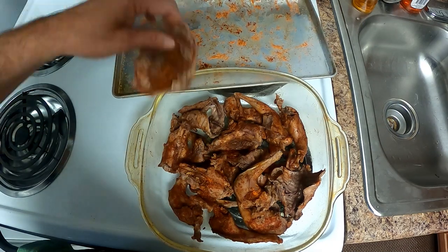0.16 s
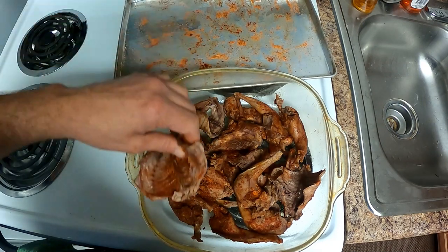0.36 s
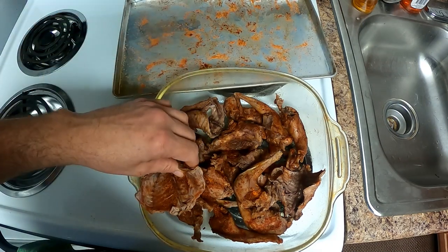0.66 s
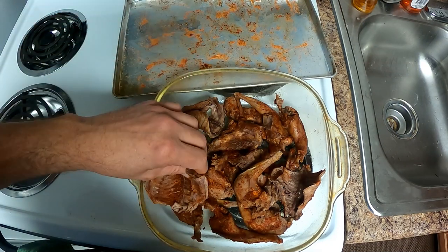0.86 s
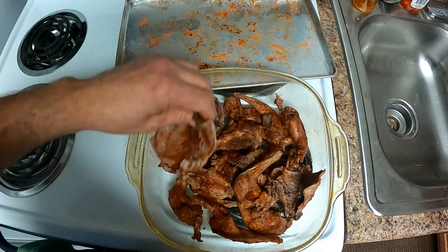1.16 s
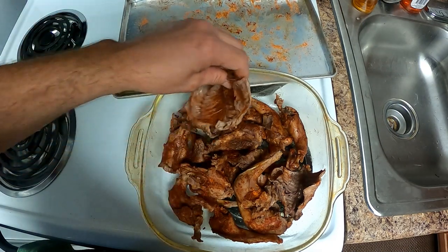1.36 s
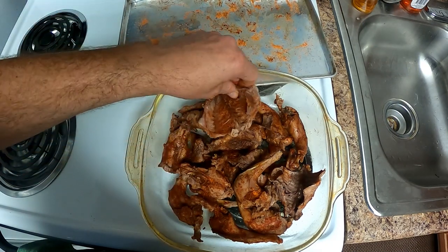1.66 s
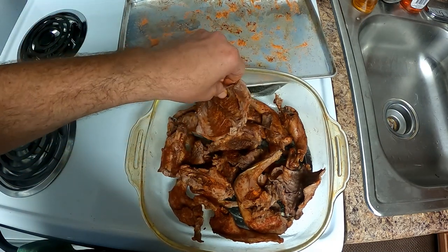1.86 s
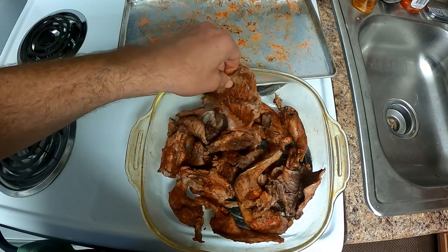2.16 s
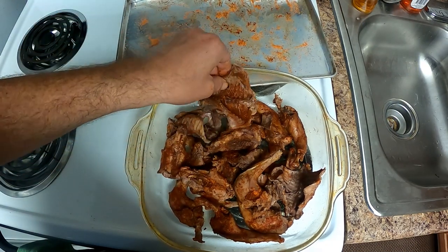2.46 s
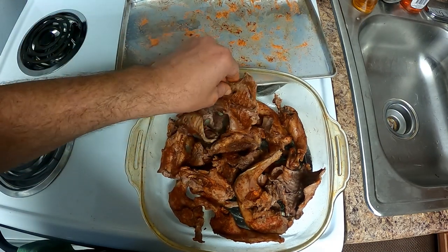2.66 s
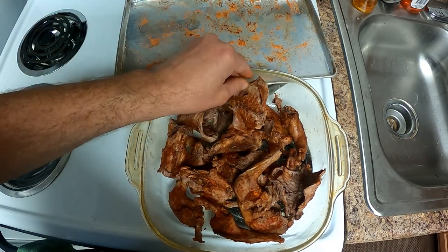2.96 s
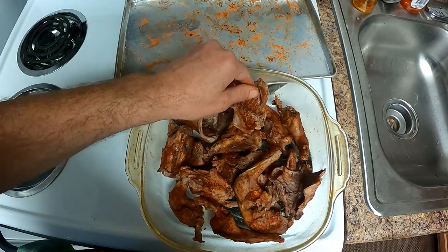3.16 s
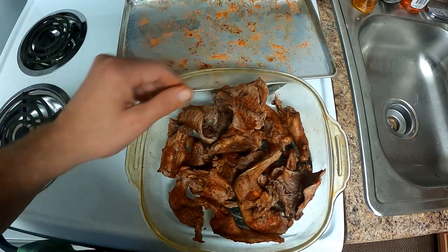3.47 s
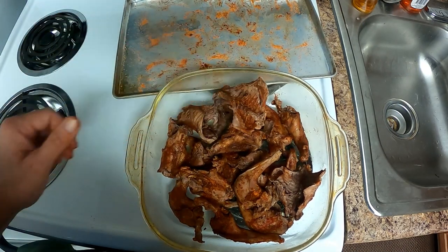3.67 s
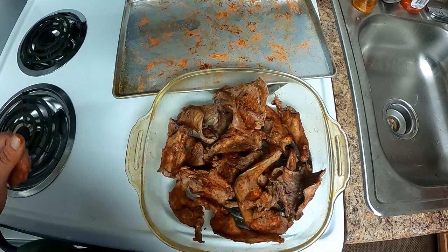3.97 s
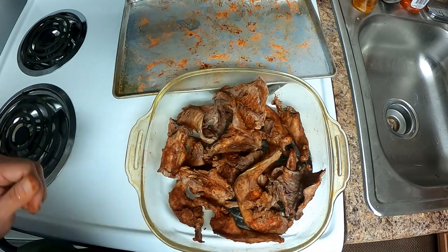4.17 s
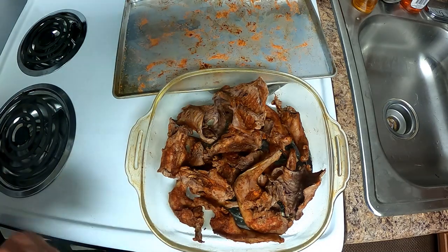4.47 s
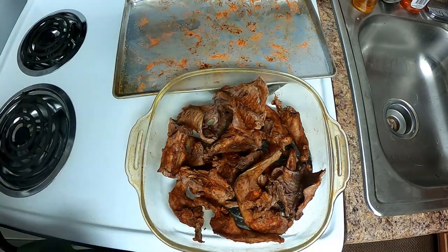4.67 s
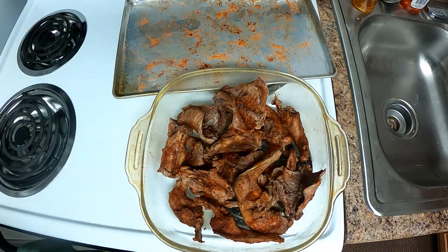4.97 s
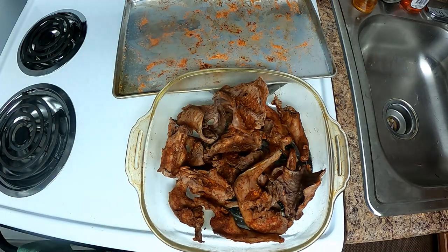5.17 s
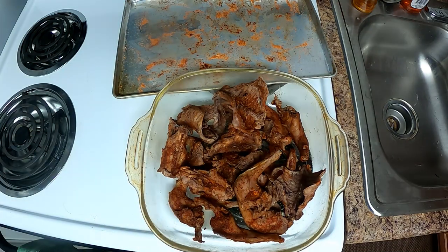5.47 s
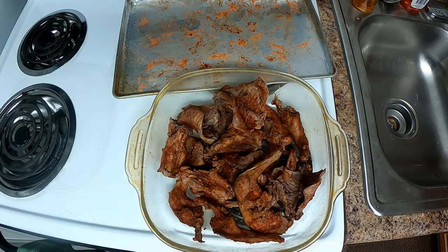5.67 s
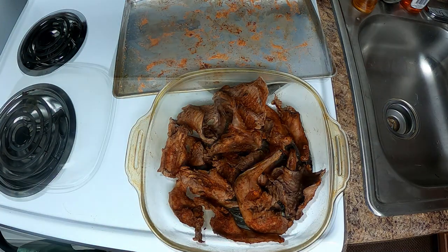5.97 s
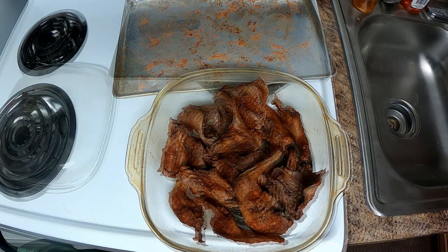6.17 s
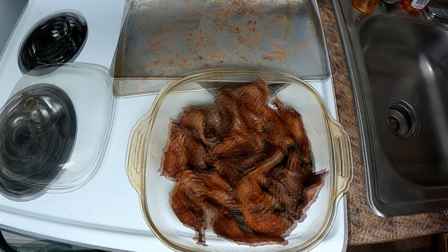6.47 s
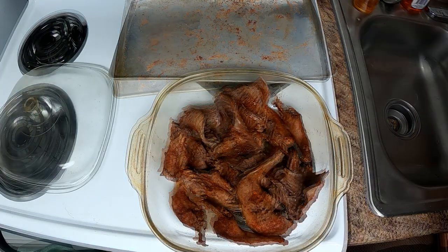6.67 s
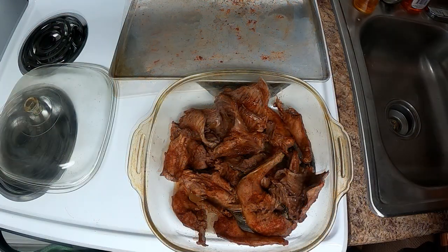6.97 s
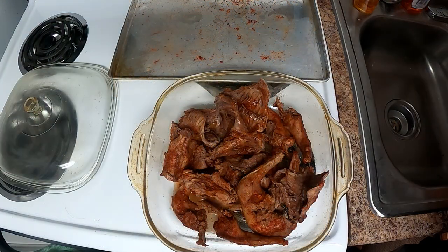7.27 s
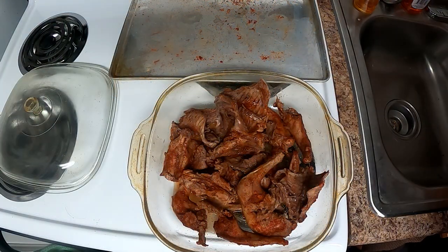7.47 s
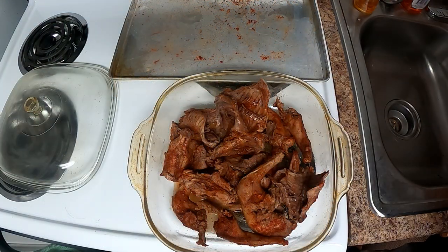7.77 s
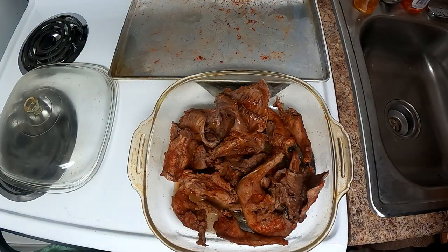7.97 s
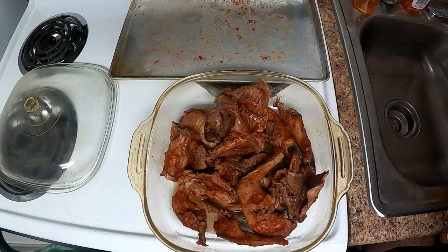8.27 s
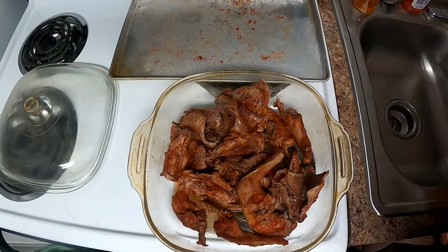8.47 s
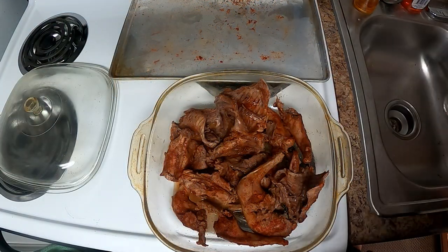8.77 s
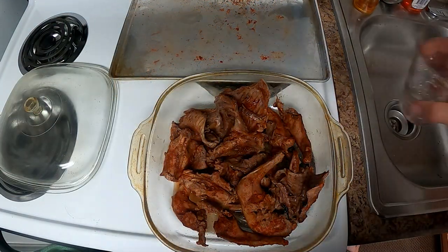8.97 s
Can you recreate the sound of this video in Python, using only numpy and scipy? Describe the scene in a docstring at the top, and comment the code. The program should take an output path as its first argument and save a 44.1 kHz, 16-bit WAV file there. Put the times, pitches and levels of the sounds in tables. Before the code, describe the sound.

Short, damped glass clunks and stove thuds come with tinny rattles, slippery squelches and tiny pops. They thin out, return with a sharper knock, then rock to a stop. Quiet skin and cloth strokes follow, then a deep double-bouncing lid thud, a one-second splashing tap hiss, soft bumps and final rubs. Close microphone, small quiet kitchen with short echo.

```python
"""A glass baking dish rocks and knocks on a stove as meat is pushed into it, and a metal tray rattles beside
it. Knocks ring the modes of the glass and shake the stove top; the tray chatters in noise and tiny contacts.
The meat slides, pops and squelches and the dish skids; hands are wiped in strokes of noise, and a glass lid
thuds down. After a few soft bumps the tap hisses briefly into the steel sink, as fluttering noise with splash
resonances. A small kitchen, heard from close above the dish."""
import sys
import numpy as np
from scipy import signal
from scipy.fft import rfft, irfft, next_fast_len
from scipy.io import wavfile

SR = 44100
rng = np.random.default_rng(int(sys.argv[2]) if len(sys.argv) > 2 else 0)


def wav_record(signal):
    """Record a signal, one row per channel, as 16-bit PCM in the file named by sys.argv[1]."""
    frames = np.transpose(np.atleast_2d(signal))
    bounded = np.clip(frames, -1, 1)
    # unit amplitude maps onto the largest positive 16-bit level
    quanta = np.round(bounded * 32767).astype(np.int16)
    wavfile.write(sys.argv[1], SR, quanta)


N = 401751   # length in samples

# How wide the sound spreads at each pitch. Each row: frequency in Hz, side level against the middle in dB.
STEREO_WIDTH = [(60, -28), (250, -16), (1000, -13), (2200, -7), (4500, -5.5), (8000, -.5), (15000, -1)]


def from_db(db):
    """Turn decibels into a gain."""
    return np.exp(np.asarray(db) * (np.log(10) / 20))


def rms_one(x):
    """Scale a signal to rms 1."""
    return x / np.sqrt(np.mean(x ** 2) + 1e-20)


def level(rows):
    """Gain over time from rows of seconds and dB, silent outside their span."""
    rows = np.array(rows)
    db = np.interp(np.arange(N) / SR, rows[:, 0], rows[:, 1], left=-200, right=-200)
    return from_db(db)


def at_hz(points, hz):
    """Read a table between its rows, on a log-frequency axis."""
    points = np.array(points)
    return np.interp(np.log(hz + 1), np.log(points[:, 0]), points[:, 1])


def noise(spectrum):
    """Coloured stereo noise, wider towards the treble; its middle has rms 1."""
    size = next_fast_len(N)
    hz = np.arange(size // 2 + 1) * SR / size
    white = rng.standard_normal((2, len(hz))) + 1j * rng.standard_normal((2, len(hz)))
    white[1] *= from_db(at_hz(STEREO_WIDTH, hz))
    mid, side = irfft(white * from_db(at_hz(spectrum, hz)), size)[:, :N]
    return np.array([mid + side, mid - side]) / mid.std()


def grains(spectrum, per_s):
    """Coloured stereo crackle of tiny separate contacts; its middle has rms 1."""
    size = next_fast_len(N)
    hz = np.arange(size // 2 + 1) * SR / size
    happens = rng.random(size) < per_s / SR
    contacts = happens * rng.choice([-1, 1], (2, size)) * rng.uniform(0.66, 1.5, size)
    shaped = rfft(contacts) * from_db(at_hz(spectrum, hz))
    shaped[1] *= from_db(at_hz(STEREO_WIDTH, hz))
    mid, side = irfft(shaped, size)[:, :N]
    return np.array([mid + side, mid - side]) / mid.std()


def flutter(rate, depth_db):
    """A random gain that takes a new value rate times a second; rms 1."""
    points = np.clip(rng.standard_normal(N // 8), -2, 2)
    wander = np.interp(np.arange(N) * rate / SR, np.arange(len(points)), points)
    return rms_one(from_db(depth_db * wander))


def clicks(times, db):
    """One click per blow."""
    out = np.zeros(N)
    spots = np.clip(np.round(np.asarray(times) * SR).astype(int), 0, N - 1)
    np.add.at(out, spots, from_db(db))
    return out


def dying(blows, t60, rise):
    """Envelope of blows whose energy builds up quickly and dies away by 60 dB in t60 seconds."""
    fall, swelling = from_db(-120 / (t60 * SR)), np.exp(-1 / (rise * SR))
    energy = signal.lfilter([1], [1, -fall], blows ** 2 + 1e-20)
    return np.sqrt(signal.lfilter([1 - swelling], [1, -swelling], energy))


def held(start, end, attack, t60):
    """Envelope that rises at start, holds, and dies away after end."""
    t = np.arange(N) / SR
    rising = 1 - np.exp(-np.maximum(t - start, 0) / attack)
    return rising * from_db(-60 * np.maximum(t - end, 0) / t60)


def swell(peak, rise, fall):
    """Envelope that grows up to its peak and fades again."""
    t = np.arange(N) / SR - peak
    return np.exp(np.maximum(np.minimum(t / rise, -t / fall), -20))


def ring(blows, hz, t60):
    """A unit click sets a dying sine of height 1 ringing."""
    r, w = from_db(-60 / (t60 * SR)), 2 * np.pi * hz / SR
    return signal.lfilter([0, np.sin(w)], [1, -2 * r * np.cos(w), r * r], blows + 1e-18)


def resonate(x, hz, width):
    """A resonance that favours one pitch, with gain 1 on top."""
    r = np.exp(-np.pi * width / SR)
    feedback = [1, -2 * r * np.cos(2 * np.pi * hz / SR), r * r]
    return signal.lfilter(np.array([1, 0, -1]) * (1 - r * r) / 2, feedback, x)


def struck(times, db, modes, vary_db, spread_db, detune, dulling=0, damping=0):
    """Each blow rings each mode with its own strength, decay and slightly shifted pitch."""
    hz, mode_db, t60 = np.transpose(modes)
    out = np.zeros((2, N + SR))
    t = np.arange(int(min(t60.max(), 1) * SR)) / SR
    # neighbouring modes swing in opposite phase and lean to opposite sides
    sign = (-1) ** np.arange(len(hz))
    lean = sign * from_db(spread_db * np.array([sign, -sign]))
    for s, blow_db in zip(times, db):
        strength, shift, grip = rng.standard_normal((3, len(hz)))
        fade = from_db(-60 * t / (t60 * np.exp(damping * grip))[:, None])
        # a softer blow stays in contact longer and excites the high modes less
        tilt_db = dulling * (blow_db - np.median(db)) * np.log2(hz / np.median(hz))
        rings = fade * np.sin(2 * np.pi * (hz * (1 + detune * shift))[:, None] * t)
        gains = lean * from_db(blow_db + mode_db + tilt_db + vary_db * strength)
        start = max(round(s * SR), 0)
        out[:, start:start + len(t)] += gains @ rings
    return out[:, :N]


def kitchen(x, wet_db, gap=0.00154):
    """Add the room: a dense stereo tail, built in bands, whose treble dies sooner."""
    # How long the kitchen echoes. Each row: frequency in Hz, time to fall by 60 dB in seconds.
    echo_times = [(150, 0.86), (400, 0.3), (1200, 0.23), (3000, 0.22), (8000, 0.062), (15000, 0.076)]
    t, tail = np.arange(SR * 3 // 4) / SR, 0
    edges = np.geomspace(110, 16000, 9)
    for low, high in zip(edges, edges[1:]):
        hz = np.sqrt(low * high)
        band = signal.butter(2, [low, high], "band", fs=SR, output="sos")
        mid, side = signal.sosfilt(band, rng.standard_normal((2, len(t))))
        side = side * from_db(min(at_hz(STEREO_WIDTH, hz) + 3, 0)) * [[1], [-1]]
        fade = from_db(-60 * t / at_hz(echo_times, hz))
        tail = tail + rms_one(mid + side) * np.sqrt(high - low) * fade
    tail = tail * (t > gap)   # the first echo comes after a short gap in seconds
    tail = tail / np.sqrt(np.sum(tail ** 2) / 2)
    return x + from_db(wet_db) * signal.fftconvolve(x, tail, axes=1)[:, :N]


def dish_blows(count=5):
    """Times and ring, rattle and thud levels of all knocks: the hand's and the free swings."""
    # The hand knocks the dish about. Each row: time in seconds, glass ring in dB, tray rattle in dB.
    hand_knocks = [(0.0014, -29, -48.5), (0.052, -47, -41.5), (0.069, -25.5, -52.5), (0.159, -45, -39.5),
                   (0.2603, -29, -44), (0.3745, -32, -48), (0.4036, -35, -51), (0.4517, -38, -60),
                   (0.4785, -32.5, -53.5), (0.5586, -45, -54.5), (0.5985, -32, -50.5), (0.7796, -41, -82),
                   (0.8692, -49, -74), (0.9532, -43, -74.5), (1.1847, -52.5, -93), (1.4286, -54.5, -86),
                   (1.6132, -57, -86), (1.6505, -30.5, -64), (1.739, -35.5, -60), (1.7536, -35, -56),
                   (1.8865, -55, -57), (1.8982, -30.5, -57.5), (2.0109, -39.5, -59), (2.0782, -39.5, -64.5),
                   (2.092, -37.5, -68), (2.1226, -44, -84), (2.354, -53.5, -97), (2.4723, -57, -76),
                   (2.5157, -45.5, -66.5), (2.8449, -33.5, -71.5), (3.0632, -31, -66), (3.2175, -36, -69),
                   (3.2878, -20, -43.5), (3.407, -27.5, -61.5), (3.4784, -31.5, -54.5),
                   (3.5126, -28.5, -59.5)]
    # Let go, the dish rocks on, ever slower and weaker. Each row: start in seconds, first ring in dB,
    # first gap in seconds, growth of the gap per swing as a factor, loss per swing in dB.
    free_rocking = [(3.6403, -34, 0.1229, 1.105, 4.5)]
    rows, swings = list(hand_knocks), np.arange(count)
    for start, db, gap, growth, loss_db in free_rocking:
        gaps = gap * growth ** swings
        ring_db = db - loss_db * swings
        rattle_db = ring_db - 35   # the tray only rattles faintly while the dish rocks freely
        rows += zip(start + np.cumsum(gaps) - gaps, ring_db, rattle_db)
    times, ring_db, rattle_db = np.transpose(rows)
    # glass and tray both shake the stove: how much of each blow reaches its top
    thud_from_glass_db, thud_from_tray_db = -14, -1.5
    thud = np.hypot(from_db(ring_db + thud_from_glass_db), from_db(rattle_db + thud_from_tray_db))
    return times, ring_db, rattle_db, 20 * np.log10(thud)


def dish(times, ring_db, thud_db):
    """The dish rocks on the stove: the glass rings, damped by the meat, and the sheet steel below thuds."""
    # Ringing tones of the loaded dish. Each row: frequency in Hz, level in dB, 60 dB decay in seconds.
    glass_modes = [(941, -17.5, 0.23), (1185, -2, 0.07), (1348, -2.5, 0.039), (1433, -11.5, 0.05),
                   (1531, -6.5, 0.076), (2151, -5, 0.074), (2440, -13, 0.025), (2590, -10, 0.028),
                   (2663, -5.5, 0.038), (3180, -13, 0.045)]
    # Ringing tones of the enamel stove top. Each row: frequency in Hz, level in dB, 60 dB decay in seconds.
    stove_modes = [(161.5, -17, 0.46), (356.7, -2, 0.23), (417.3, -6, 0.18), (496, -9.5, 0.2)]
    # Colour of the stove's dull thud. Each row: frequency in Hz, level in dB per Hz.
    panel_colour = [(25, 1.5), (60, 6.5), (110, -0.5), (170, 2.5), (260, -3), (420, 1.5), (600, -6.5),
                    (1200, -2), (2500, -17), (6000, -68)]
    # A piece flops down and the stove top thuds. Each row: time in seconds, thud in dB.
    meat_flops = [(0.3741, -43), (0.597, -49), (1.898, -39), (2.012, -42), (2.1225, -48.5), (3.2881, -41.5),
                  (3.407, -49)]
    glass = struck(times, ring_db - 7.0, glass_modes, vary_db=1.7, spread_db=1.0, detune=0.005,
                   dulling=0.2, damping=0.15)
    # the dish touches down a second time a few milliseconds later
    rebound_s = rng.uniform(0.0014, 0.0068, len(times))
    glass += struck(times + rebound_s, ring_db - 19, glass_modes, vary_db=1.5, spread_db=-2.0,
                    detune=.06, dulling=0.4)
    times, thud_db = np.hstack([[times, thud_db], np.transpose(meat_flops)])
    stove = struck(times, thud_db - 1.5, stove_modes, vary_db=-1.5, spread_db=1.2, detune=0.031)
    panel = noise(panel_colour) * dying(clicks(times, thud_db - 7.0), t60=0.34, rise=0.0045)
    contact_hz = 3600   # the blunt contact excites little above this
    blunt = signal.butter(6, contact_hz, fs=SR, output="sos")
    return signal.sosfilt(blunt, glass + stove + 1e-18) + panel


def tray(times, rattle_db):
    """Each knock cracks against the thin tray and sets it chattering in quick uneven contacts."""
    # Colour of the rattle. Each row: frequency in Hz, level in dB per Hz.
    rattle_colour = [(200, -37), (450, -3.5), (800, 1), (1500, 2), (3000, -0.5), (4000, -8), (6500, -8.5),
                     (8500, -17), (11000, -30), (16000, -54)]
    # Resonances of the tray. Each row: frequency in Hz, width in Hz, level in dB.
    tray_resonances = [(1028, 27, 3.5), (1217, 59, -3.5), (1735, 75, -1), (2380, 180, -5.5), (2895, 90, -8),
                       (3260, 74, -2), (4520, 450, -2.5), (5040, 180, -5)]
    # How bright the rattle is above 7 kHz. Each row: time in seconds, treble level in dB.
    treble_level = [(0, -3.5), (0.26, -1), (0.35, -16), (0.65, -30), (1.6, -38), (1.9, 5), (2.1, -1),
                    (3.2, -25), (4.3, 8)]
    blows = clicks(times, rattle_db + 5.5)
    crack = dying(blows, t60=0.023, rise=0.00036)
    chatter = dying(blows, t60=0.08, rise=0.0043) + from_db(-7) * dying(blows, t60=0.25, rise=0.014)
    scrape = grains(rattle_colour, per_s=700)
    contacts = noise(rattle_colour) * (from_db(1.0) * crack + from_db(-3) * chatter)
    contacts = contacts + from_db(-4.5) * scrape * chatter
    treble = signal.sosfiltfilt(signal.butter(2, 7000, "high", fs=SR, output="sos"), contacts)
    contacts = contacts + (level(treble_level) - 1) * treble
    body = sum(from_db(db) * resonate(contacts, hz, width) for hz, width, db in tray_resonances)
    return contacts + from_db(3.0) * body


def pressure():
    """How hard the meat is rubbed on the glass: a light hold and a few pushes."""
    # The meat is pressed along the glass. Each row: start in seconds, end in seconds, level in dB.
    push_rows = [(-0.03, 0.597, -45), (1.644, 1.98, -55.5), (3.31, 3.524, -64)]
    attack_s, t60_s = 0.0045, 0.1
    pushes = sum(from_db(db) * held(start, end, attack_s, t60_s) for start, end, db in push_rows)
    # between pushes the fingers only shift it, until they let go
    hold_db, let_go_s = -70.5, 4.4
    return pushes + from_db(hold_db) * held(0, let_go_s, attack_s, t60_s)


def meat_and_skids():
    """Wet pieces stick and slip on the glass; small air pockets pop, larger ones squelch and sink in pitch, and
    the dish skids in short rough bursts."""
    # Colour of the wet slide. Each row: frequency in Hz, level in dB per Hz.
    slide_colour = [(47, -52), (95, -17), (155, 2.5), (259, -14), (410, -7), (539, -13.5), (770, -7.5),
                    (1710, -10), (6810, -40.5), (15600, -81)]
    # Short rough skids of the dish and wet squelches of the meat. Each row: time in seconds, level in dB, pitch
    # in Hz.
    skid_and_squelch_rows = [(.222, -40, 1230), (0.288, -34, 930), (.605, -37.5, 1200), (0.732, -42, 802),
                             (0.791, -44, 1244), (0.906, -49, 800), (1.269, -59.5, 1280), (1.667, -45, 777),
                             (1.744, -40, 1060), (1.776, -50, 1220), (1.912, -40, 485), (2.124, -43, 1136),
                             (2.652, -55, 1400), (3.333, -34, 1475)]
    slips = grains(slide_colour, per_s=600)
    slide = from_db(-3.5) * noise(slide_colour) + from_db(-3.0) * slips
    slide = slide * flutter(rate=70, depth_db=4.5)

    pops, pops_per_s, cycles = 0, 6, 28   # pops per second at each pitch; cycles until 60 dB down
    for hz in np.geomspace(350, 2800, 18):
        born = rng.random(N) < pops_per_s / SR
        sizes = np.zeros(N)
        sizes[born] = rng.standard_normal(born.sum())
        pops = pops + ring(sizes, hz, cycles / hz)
    pops = signal.sosfilt(signal.butter(2, 3500, fs=SR, output="sos"), pops)   # the flesh muffles them

    # the pitch wavers by this many Hz, and sinks by this share over this time
    waver_hz, sag, sag_s = 140, 0.05, 0.067
    skids_and_squelches, t = 0, np.arange(N) / SR
    sticking = flutter(rate=300, depth_db=5)
    for s, db, hz in skid_and_squelch_rows:
        pitch = hz * (1 - sag * (np.clip((t - s) / sag_s, 0, 1) - .5))
        waver = np.interp(t, np.arange(N // 100) * 100 / SR, rng.standard_normal(N // 100))
        pocket = np.sin(2 * np.pi * np.cumsum(pitch + waver_hz * waver) / SR)
        wet = from_db(-3) * rms_one(resonate(slips, hz, hz / 2))
        skids_and_squelches = skids_and_squelches + (sticking * pocket + wet) * dying(clicks([s], [db]), t60=0.11, rise=0.0032)
    rubbing = from_db(-2.0) * slide + from_db(-8.0) * rms_one(pops)
    return pressure() * rubbing + from_db(-4.5) * skids_and_squelches


def background():
    """The quiet kitchen: low room tone and a faint hiss of noise, and a thin electronic whine from a sine."""
    # Colour of the room tone. Each row: frequency in Hz, level in dB per Hz.
    room_colour = [(20, 10), (100, -2.5), (200, 3), (340, 4.5), (520, -10), (1200, -16.5), (2200, -26),
                   (4000, -36.5), (16000, -44)]
    # The faint hiss comes and goes. Each row: time in seconds, level in dB.
    hiss_level = [(0, -88.5), (2.2, -80.5), (3.2, -73.5), (4.03, -77), (4.25, -78), (4.7, -71), (6.4, -70),
                  (7.1, -79), (9.1, -64.5)]
    # colour of the hiss: frequency in Hz, level in dB per Hz
    hiss_colour = [(300, -1.5), (1200, 9.5), (3000, 3), (7500, -1.0), (9000, -10), (16000, -35)]
    hiss = level(hiss_level) * noise(hiss_colour)
    whine_hz = 10250
    whine = from_db(-99.5) * np.sin(2 * np.pi * whine_hz * np.arange(N) / SR)
    return from_db(-68.5) * noise(room_colour) + hiss + whine


def bumps():
    """Steps and bumps reach the microphone as low thuds; moving air rumbles below them."""
    # Soft bumps and steps. Each row: time in seconds, boom in dB, knock in dB.
    bump_rows = [(0.285, -42.5, -56), (1.805, -56, -52), (2.074, -50.5, -48.5), (5.909, -37, -84),
                 (5.96, -42, -68), (6.485, -52, -50.5), (6.709, -55, -53), (6.876, -42.5, -80),
                 (7.143, -40, -62.5), (7.192, -44, -41.5), (8.072, -30.5, -44.5), (8.109, -36, -44),
                 (8.289, -42, -55), (8.793, -41, -70), (8.95, -46.5, -52.5)]
    # Colour of the low boom. Each row: frequency in Hz, level in dB per Hz.
    boom_colour = [(20, -2), (60, 8.5), (110, 3.5), (180, -11.5), (300, -29), (800, -100)]
    # Colour of the knock. Each row: frequency in Hz, level in dB per Hz.
    knock_colour = [(80, -4), (220, 0.5), (500, -13.5), (900, -23.5), (2500, -31.5), (16000, -74)]
    # Low rumbling swells: mostly puffs of air, the first two the low shudder of a landing piece and of the
    # shaking dish. Each row: loudest moment in seconds, level in dB.
    puff_rows = [(2.18, -48), (3.46, -42), (5.081, -35), (5.38, -45), (5.527, -36.5), (5.588, -44.5),
                 (5.825, -31), (6.3, -43), (7.29, -38), (8.977, -33.5), (9.091, -38)]
    times, boom_db, knock_db = np.transpose(bump_rows)
    booms = noise(boom_colour) * dying(clicks(times, boom_db), t60=0.39, rise=0.018)
    knocks = noise(knock_colour) * dying(clicks(times, knock_db), t60=0.26, rise=0.0018)
    rise_s, fade_s = 0.022, 0.046
    puffs = sum(from_db(db) * swell(s, rise_s, fade_s) for s, db in puff_rows)
    # later the air keeps stirring between the puffs
    draught_from_s, draught_db = 4.88, -61.5
    draught = from_db(draught_db) * held(draught_from_s, N / SR, rise_s, 1)
    # colour of the low rumble: frequency in Hz, level in dB per Hz
    air_colour = [(8, -15.5), (25, -4.0), (45, -3.0), (80, -35.5), (200, -39), (600, -83)]
    air = (puffs + draught) * noise(air_colour)
    return booms + knocks + air


def hands():
    """Skin and cloth rub in short fine-grained strokes; something small and hard ticks once."""
    # Strokes of hands and cloth. Each row: loudest moment in seconds, swell time in seconds,
    # dull shuffle in dB, bright rub in dB.
    stroke_rows = [(4.31, 0.12, -55.5, -66), (4.468, 0.06, -43, -63.5), (4.95, 0.081, -79, -65),
                   (5.12, 0.1, -56, -65.5), (5.476, 0.066, -58, -58), (6.809, 0.11, -57, -67),
                   (8.24, 0.24, -53, -68.5), (8.5, 0.085, -57.5, -67.5), (8.605, 0.063, -54.5, -63),
                   (8.7, 0.075, -56.5, -61), (8.786, 0.049, -75, -59), (9.04, 0.025, -58, -67.5),
                   (9.1, 0.038, -46.5, -59.5)]
    # Short flicks and ticks of the fingers. Each row: time in seconds, level in dB, 60 dB decay in seconds.
    flick_rows = [(4.816, -49.5, 0.27), (5.086, -60, 0.58), (6.714, -60, 0.3), (8.978, -58, 0.061)]
    # Colour of the dull shuffle. Each row: frequency in Hz, level in dB per Hz.
    shuffle_colour = [(300, -3), (620, -5), (980, 6.5), (1270, 4), (1750, 3.5), (2500, -3.5), (6000, -41)]
    # Colour of the bright rub. Each row: frequency in Hz, level in dB per Hz.
    rub_colour = [(700, -30), (1800, -5), (3500, -2), (7500, -9.5), (9000, -20), (13000, -29.5),
                  (16000, -60)]
    # Short ring of the hard tick. Each row: frequency in Hz, level in dB, 60 dB decay in seconds.
    tick_modes = [(2600, -9, 0.014), (4150, -3, 0.014), (4600, 0, 0.016)]
    fade_share = 0.83   # a stroke's fade time as a share of its swell time
    shapes = np.array([swell(s, rise, fade_share * rise) for s, rise, _, _ in stroke_rows])
    dull, bright = np.sqrt(from_db(np.transpose(stroke_rows)[2:]) ** 2 @ shapes ** 2)
    flicks = sum(dying(clicks([s], [db]), t60, rise=0.00039) for s, db, t60 in flick_rows)
    crackle = grains(shuffle_colour, per_s=1000)
    catching = flutter(rate=90, depth_db=2.2)
    shuffles = from_db(-10.5) * dull * catching * kitchen(crackle, wet_db=-2.5)
    rubs = (from_db(2.0) * bright * catching + flicks) * noise(rub_colour)
    # one small hard tick as the hand leaves
    tick_s, tick_db = 4.319, -49
    tick = struck([tick_s], np.array([tick_db]), tick_modes, vary_db=0, spread_db=0, detune=0)
    return shuffles + rubs + kitchen(tick, wet_db=-12)


def lid():
    """The heavy glass lid booms on the stove top and settles, with dull scuffs of its rim."""
    # The lid lands and settles. Each row: time in seconds, boom in dB, scuff in dB.
    lid_blows = [(6.107, -25, -39), (6.116, -22, -37.5), (6.1268, -20, -46.5), (6.149, -36, -49),
                 (6.165, -26, -50), (6.212, -33, -58), (6.2449, -44, -72)]
    # Ringing tones of lid and stove together. Each row: frequency in Hz, level in dB, 60 dB decay in seconds.
    lid_modes = [(91, 5, 0.31), (132, -6, 0.26), (217, 0, 0.23), (300, -15, 0.25), (503, -15, 0.19),
                 (770, -31, 0.19), (1021, -22, 0.26), (1470, -21, 0.12), (1745, -25, 0.28)]
    # Colour of the rim's scuff. Each row: frequency in Hz, level in dB per Hz.
    scuff_colour = [(180, -4.5), (300, -5), (388, -17.5), (486, -5.5), (681, -12.5), (1030, -8),
                    (1500, -12), (5170, -26.5), (14000, -57)]
    times, boom_db, scuff_db = np.transpose(lid_blows)
    boom = struck(times, boom_db - 9.0, lid_modes, vary_db=0.7, spread_db=0, detune=0)
    scuff = noise(scuff_colour) * dying(clicks(times, scuff_db), t60=0.16, rise=0.0011)
    return boom + kitchen(scuff, wet_db=-5.5)


def tap():
    """An aerated jet hisses as fluttering noise, its splash resonates, and the steel basin drums low."""
    # Colour of the jet. Each row: frequency in Hz, level in dB per Hz.
    jet_colour = [(200, -15.5), (800, -10.5), (1400, -10), (2100, -4), (5000, -4), (7700, -6.5),
                  (8800, -14), (12300, -18.5), (15500, -26)]
    # Splash resonances that swell and fade. Each row: frequency in Hz, width in Hz, level against the flow
    # in dB, loudest moment in seconds, spread in seconds.
    splash_rows = [(980, 180, -15, 7.8, 0.2), (1650, 240, -11.5, 7.34, 0.19),
                   (2176, 150, -10.5, 7.68, 0.19), (3980, 730, -5.5, 7.56, 0.43)]
    # Colour of the drumming basin. Each row: frequency in Hz, level in dB per Hz.
    sink_colour = [(30, -36), (105, -1), (135, -5.5), (200, -25), (400, -21.5), (1000, -91)]
    t = np.arange(N) / SR
    water = noise(jet_colour) * flutter(rate=910, depth_db=1.0) * from_db(-1.5)
    spray = noise(jet_colour)
    for hz, width, db, centre, spread in splash_rows:
        tone = rms_one(resonate(resonate(spray, hz, width), hz, width))
        water = water + from_db(db) * np.exp(-((t - centre) / spread) ** 2 / 2) * tone
    # the basin wall throws the middle of the hiss to the left
    water = water + 0.27 * resonate(water, hz=2040, width=3000) * np.array([[1], [-1]])
    # the tap runs at a steady flow between opening and closing
    open_s, close_s, flow_db = 7.219, 8.04, -37.5
    flow = from_db(flow_db) * held(open_s, close_s, attack=0.026, t60=0.25)
    return flow * (kitchen(water, wet_db=-9.5) + from_db(-11.0) * noise(sink_colour))


def scene():
    """All sounds together; the dish sits slightly to the right, below the microphone."""
    times, ring_db, rattle_db, thud_db = dish_blows()
    cooking = dish(times, ring_db, thud_db) + tray(times, rattle_db) + meat_and_skids()
    left, right = kitchen(cooking, wet_db=-9.0) * from_db(0.28 * np.array([[-1], [1]]))
    dish_lag_s = 0.000042   # the dish is heard this much later on the left
    left = np.pad(left, (round(dish_lag_s * SR), 0))[:N]
    return np.array([left, right]) + lid() + bumps() + hands() + tap() + background()


def record(dry):
    """The top is cut steeply."""
    cutoff_hz = 15750
    return signal.sosfilt(signal.ellip(12, .1, 80, cutoff_hz, fs=SR, output="sos"), dry)


dry = scene()
out = record(dry)
wav_record(out)
```